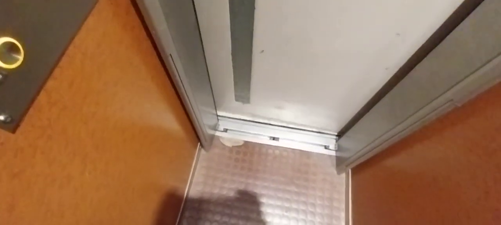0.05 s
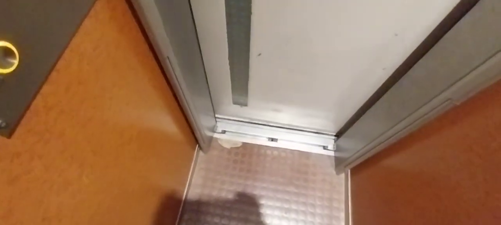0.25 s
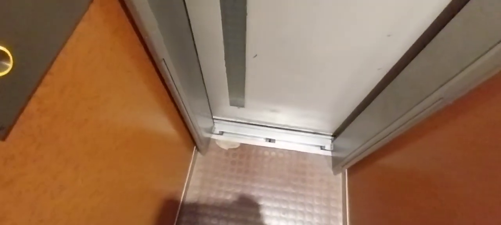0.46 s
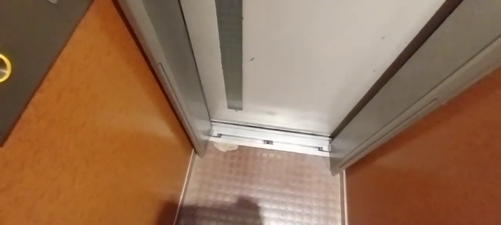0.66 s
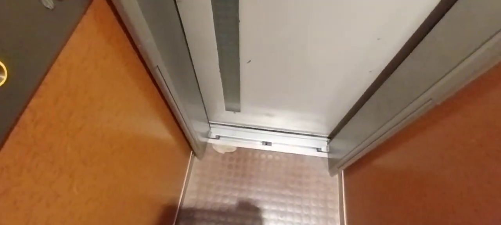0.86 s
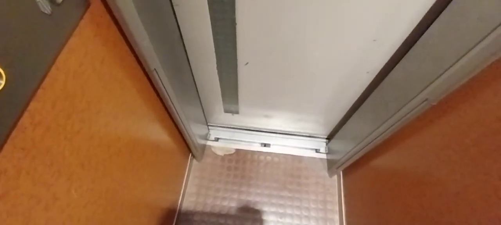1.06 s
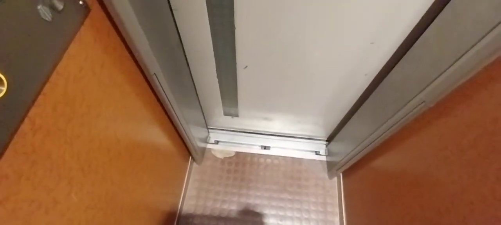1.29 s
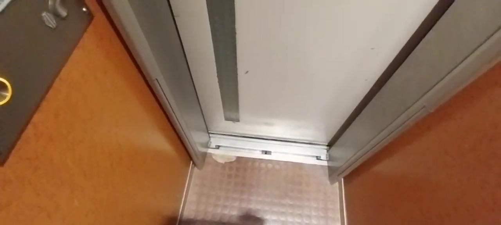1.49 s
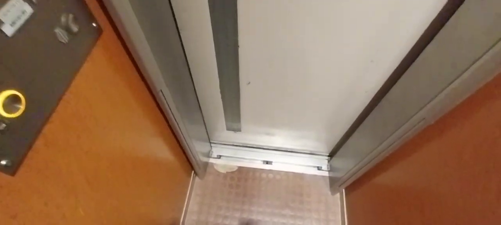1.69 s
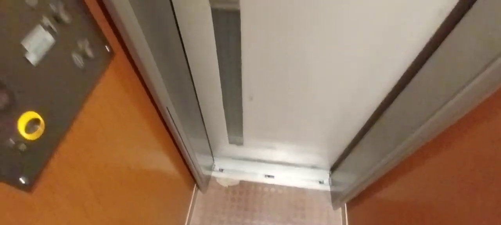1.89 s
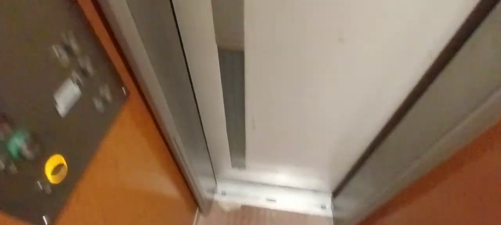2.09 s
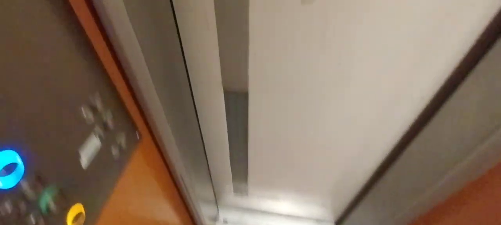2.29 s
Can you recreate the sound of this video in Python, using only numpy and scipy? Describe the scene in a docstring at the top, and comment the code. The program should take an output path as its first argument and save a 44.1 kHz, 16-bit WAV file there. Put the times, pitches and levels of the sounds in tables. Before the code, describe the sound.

An elevator door locks with sharp latch clicks and a loud metallic clunk, heard from inside the small cabin. A second, softer knock follows, and the cabin rumbles briefly before settling into a faint low hum.

```python
"""An elevator door locks, heard from inside the small cabin. First the latch clicks and steel parts
clack as the lock snaps over; the door clunks, and its blows ring the modes of the door and wall panels.
Two light ticks and a second knock follow while the shaken cabin rumbles on. A faint sliding hiss
dies away, leaving a low hum, a soft rustle and three tiny squeaks."""
import sys
import numpy as np
from scipy import signal
from scipy.fft import rfft, irfft
from scipy.io import wavfile
from scipy.ndimage import uniform_filter1d, minimum_filter1d

SR = 44100
rng = np.random.default_rng(int(sys.argv[2]) if len(sys.argv) > 2 else 0)


def wav_record(signal):
    """Record a signal, one row per channel, as 16-bit PCM in the file named by sys.argv[1]."""
    frames = np.transpose(np.atleast_2d(signal))
    bounded = np.clip(frames, -1, 1)
    # unit amplitude maps onto the largest positive 16-bit level
    quanta = np.round(bounded * 32767).astype(np.int16)
    wavfile.write(sys.argv[1], SR, quanta)


N = 108045


def undb(db):
    return 10 ** (np.asarray(db) / 20)


def on_log(points, hz):
    """Interpolation of (frequency, value) points on a logarithmic frequency axis."""
    freqs, values = np.array(points, float).T
    return np.interp(np.log(np.maximum(hz, 1)), np.log(freqs), values)


def envelope(points, column=1):
    """Amplitude over time, interpolated in decibels from one column of a table."""
    table = np.array(points, float)
    return undb(np.interp(np.arange(N) / SR, table[:, 0], table[:, column]))


def pan(db):
    """Level difference between the channels, left minus right."""
    return undb(np.array([[db], [-db]]) / 2)


def decay(t, t60):
    """Exponential damping: the level falls 60 dB in t60 seconds."""
    return np.exp(-np.log(1000) * t / t60)


def add(out, start_s, sound):
    """Superposition of a sound from its onset time."""
    i = max(int(start_s * SR), 0)
    n = min(sound.shape[-1], N - i)
    out[:, i:i + n] += sound[..., :n]


def wander(width, size):
    """Random fluctuation of unit variance, correlated over about `width` steps."""
    x = np.interp(np.arange(size) / max(width, 1), np.arange(size), rng.standard_normal(size))
    return x / np.std(x)


# Stereo width of the sound field (frequency [Hz], side relative to mid [dB])
STEREO_WIDTH = [(30, -37), (80, -12), (160, -12), (300, -3.5), (600, -3.5), (1200, -0.5), (16000, 0)]

def noise(spectrum, tilt_db=0, size=2 ** 17):
    """Shaped noise with unit mid power; coherence between the channels falls from bass to treble."""
    hz = np.arange(size // 2 + 1) * SR / size
    mid, side = rfft(rng.standard_normal((2, size)))
    side = side * undb(on_log(STEREO_WIDTH, hz))
    gain = undb(on_log(spectrum, hz) + tilt_db * np.log2(np.maximum(hz, 1)))
    gain = gain / np.sqrt(np.mean(gain ** 2))
    return irfft(np.array([mid + side, mid - side]) * gain)[:, :N]


def ring(modes, spread):
    """Impulse response as a sum of damped modes, each differing in level and phase between channels."""
    t = np.arange(int(1.5 * SR)) / SR
    out = np.zeros((2, len(t)))
    for (hz, db, t60), (a, b) in zip(modes, rng.standard_normal((len(modes), 2))):
        side = spread * hz / 300 * (a + 1j * b)
        side = side / max(1, abs(side))
        phasors = np.array([[1 + side], [1 - side]]) * np.exp(2j * np.pi * hz * t)
        out += np.imag(phasors) * undb(db) * decay(t, t60)
    return out


# Modes of the door and wall panels (frequency [Hz], level [dB], T60 [s])
PANEL_MODES = [(31.5, -11.5, 0.76), (48.8, -14, 1.6), (70.2, -8.5, 0.81), (90.8, -7, 0.43),
               (159.4, -2, 0.35), (172, 1.5, 0.52), (188, -7, .3), (237, -0.5, 0.26), (311.7, -7, 0.7),
               (330, -2.5, 0.35), (359, -10.5, .22), (387.3, -14.5, .35), (471.5, -8, 0.38),
               (555.5, -8.5, 0.25), (642, -18, 0.44), (683.5, -20.5, .7)]
# Short, dense boom of the cabin (frequency [Hz], relative level [dB])
BOOM_SPECTRUM = [(20, -15), (60, -9), (120, -7), (165, 4), (210, -12), (290, -1.5), (380, -9), (600, -6.5),
                 (900, -18.5), (2000, -60)]
# Blows on the door (time [s], level [dB], contact time [s])
BLOWS = [(0.2426, -9, 0.0014), (0.3214, -28.5, 0.0014), (0.376, -21.5, 0.0074), (0.6396, -24, .0013),
         (0.6636, -28.5, 0.0011), (.696, -27.5, 0.0015), (.885, -41, 0.0023)]
PANEL_SPREAD, BUILD_UP_S = 0.04, 0.0035
BOOM_DB, BOOM_T60_S = -2, 0.29

def door():
    """Impact excitation: a half-sine force drives panels and cabin; longer contact sounds duller."""
    out, size = np.zeros((2, N)), 2 ** 16
    t = np.arange(size) / SR
    panels = ring(PANEL_MODES, PANEL_SPREAD)[:, :size]
    build_up = 1 - np.exp(-t / BUILD_UP_S)
    for start, db, contact in BLOWS:
        force = np.sin(np.pi * np.minimum(t[:2 ** 11] / contact, 1))
        boom = undb(BOOM_DB) * noise(BOOM_SPECTRUM, size=size) * decay(t, BOOM_T60_S)
        response = (boom - panels) * build_up
        add(out, start, undb(db) * signal.fftconvolve(response, force[None] / force.sum(), axes=1))
    return out * pan(db=-0.8)


# Decay of struck steel in the cabin (frequency [Hz], T60 [s])
STEEL_DECAY = [(400, 0.59), (1500, 0.36), (4000, 0.3), (8000, 0.26), (14000, 0.19)]
CRACK_DECAY_S, RESONANCE_WIDTH_HZ = 0.0049, 39.85

def steel_strikes(events, spectrum, ripple_db):
    """Reverberation: the walls prolong the dense ring after each crack, and the treble dies first."""
    out, size = np.zeros((2, N)), 2 ** 15
    t, hz = np.arange(size) / SR, np.arange(size // 2 + 1) * SR / size
    resonances = undb(ripple_db * wander(RESONANCE_WIDTH_HZ * size / SR, size=len(hz)))
    resonances = resonances / np.sqrt(np.mean(resonances ** 2))
    # Overlapping triangular bands, each with its own decay time
    bands = [on_log([(f, float(f == centre)) for f, _ in STEEL_DECAY], hz) for centre, _ in STEEL_DECAY]
    tails = [decay(t, t60) for _, t60 in STEEL_DECAY]
    for start, db, tilt, rise, crack_db in events:
        crack = undb(crack_db) * np.exp(-t / CRACK_DECAY_S)
        steel = rfft(noise(spectrum, tilt, size=size)) * resonances
        strike = sum(irfft(steel * band) * (tail + crack) for band, tail in zip(bands, tails))
        add(out, start, undb(db) * strike * np.minimum(t / rise, 1))
    return out


# Light clicks of the latch and hard clacks of the door on its steel frame
# (time [s], level [dB], tilt [dB/octave], rise time [s], crack relative to ring [dB])
LATCH_CLICKS = [(.1872, -26.5, .5, 0.0017, -3), (.201, -28, -2.5, 0.0024, -3), (.2148, -26, -1, .002, 0.5),
                (.3218, -32.5, -2.5, 0.0015, 1.5), (.3742, -36, -1.9, 0.00078, 2),
                (.5272, -46, -1.5, 0.00056, 7.5), (.5503, -41.5, -1, .0005, 0)]
FRAME_CLACKS = [(.226, -23, -2.5, 0.0027, -5.5), (.2445, -24, -2.35, 0.0023, 3.5),
                (.2555, -22.5, 0.5, .002, 1.5), (.268, -26, -3.5, 0.0025, 0), (.325, -30, 0.4, 0.0012, -2),
                (0.337, -37.5, -11, 0.0023, 0), (0.6421, -41.5, -0.4, 0.0059, 3),
                (.6632, -34, 0.63, 0.0013, -1.5)]
# Spectra of the latch and the frame (frequency [Hz], relative level [dB])
LATCH_SPECTRUM = [(200, -7.5), (550, 1.5), (1000, -5.5), (1650, -9), (2250, -8), (3000, -22.5),
                  (3700, -14.5), (4400, -7), (5100, -8), (6000, -7), (7200, -1), (8600, -20), (9800, -8),
                  (11000, -0.5), (12600, 3), (14400, -1), (16000, -12)]
FRAME_SPECTRUM = [(200, 7), (500, 3.5), (1000, -0.5), (1400, 4.5), (2100, 3), (3000, -2), (4300, 2.5),
                  (5300, 2.5), (6100, -1.5), (7000, -1), (8600, -8.5), (10500, 1.5), (12300, 2),
                  (16000, -6)]
# Modes of the lock bolt (frequency [Hz], level [dB], T60 [s])
BOLT_MODES = [(788, -8, 0.64), (963.4, -9, 0.44), (1336, -9, 0.23), (2236, -1.5, 0.23), (2300, -2, 0.15),
              (2945, -12.5, 0.13), (3320, -13, 0.16), (4470, -7.5, 0.26), (4900, -9.5, .3),
              (6660, -6, 0.15), (11000, -8, .25), (11800, -10.5, .25), (12107, -12.5, .25)]
# Impacts on the bolt (time [s], level [dB])
BOLT_IMPACTS = [(.21, -43), (.25, -39.5), (.316, -34.5), (.334, -35.5)]

def lock():
    """Free vibration after impact: latch and frame ring in dense resonances, the bolt in a few modes."""
    out = steel_strikes(LATCH_CLICKS, LATCH_SPECTRUM, ripple_db=4.5)
    out += steel_strikes(FRAME_CLACKS, FRAME_SPECTRUM, ripple_db=2.5)
    bolt = ring(BOLT_MODES, spread=0.17)
    for start, db in BOLT_IMPACTS:
        add(out, start, undb(db) * bolt)
    return out * pan(db=-3)


# Rumble of the shaken cabin (time [s], bass level [dB], panel drone level [dB])
RUMBLE_LEVELS = [(0, -61, -50), (.17, -61, -71), (.4, -24, -39), (.56, -38, -50.5), (.66, -30.5, -37),
                 (.79, -32, -45), (.87, -39, -43), (.95, -33, -45.5), (1.12, -36.5, -50.5),
                 (1.24, -38, -53.5), (1.35, -48, -63), (1.65, -49, -69.5), (2.08, -49.5, -65.5),
                 (2.25, -53.5, -61.5), (2.45, -50.5, -60)]
# Spectra of the bass and the panel drone (frequency [Hz], relative level [dB])
BASS_SPECTRUM = [(15, -17), (30, 2.5), (45, 10.5), (60, 2), (75, -8), (93, -3), (125, -18), (200, -58)]
DRONE_SPECTRUM = [(100, -2.5), (145, -2.5), (167, 7), (205, -17), (238, -3), (275, -17), (315, -8),
                  (390, -28.5), (475, -23), (700, -28.5), (1000, -52.5), (2000, -49.5)]

def rumble():
    """Random vibration: the shaken cabin radiates low noise gathered around its resonances."""
    bass = noise(BASS_SPECTRUM) * envelope(RUMBLE_LEVELS, column=1)
    drone = noise(DRONE_SPECTRUM) * envelope(RUMBLE_LEVELS, column=2)
    return bass + drone


# Panel vibration sustained by the cabin's motion (time [s], level [dB])
SHUDDER_LEVELS = [(0, -72), (.2, -64.5), (.42, -32), (.6, -42), (.72, -33.5), (.84, -43), (.92, -43),
                  (1.15, -49.5), (1.35, -67.5), (1.46, -62.5), (1.56, -70.5), (1.72, -68), (2.1, -66.5),
                  (2.25, -64), (2.45, -68)]
SHUDDER_DB_PER_OCTAVE = -3.5

def shudder():
    """Forced vibration: a random force keeps the panel modes above 80 Hz sounding."""
    modes = [(hz, db + SHUDDER_DB_PER_OCTAVE * np.log2(hz), t60)
             for hz, db, t60 in PANEL_MODES if hz > 80]
    panels = ring(modes, PANEL_SPREAD)
    force = rng.standard_normal((1, N + panels.shape[1] - 1))
    vibration = signal.fftconvolve(force, panels, mode="valid", axes=1)
    return vibration / np.std(vibration) * envelope(SHUDDER_LEVELS)


# Low hum of the cabin (time [s], frequency [Hz], level [dB])
HUM_TRACK = [(0, 162.5, -49.5), (.15, 164.3, -62.5), (0.401, 160, -37.5), (.8, 166, -41), (0.898, 172, -58),
             (1.12, 170.9, -41.5), (1.25, 167.1, -63), (1.5, 162.8, -60.5), (1.9, 165, -69.5),
             (2.45, 165.2, -68)]

def hum():
    """A pure tone whose phase is the integral of its slowly drifting frequency."""
    times, freqs, _ = np.array(HUM_TRACK, float).T
    hz = np.interp(np.arange(N) / SR, times, freqs)
    return envelope(HUM_TRACK, column=2) * np.sin(2 * np.pi * np.cumsum(hz) / SR)


# Sliding hiss (time [s], lower band level [dB], upper band level [dB])
SLIDE_LEVELS = [(0, -74.5, -79), (.15, -94, -84.5), (.45, -57, -59.5), (.85, -58, -61.5),
                (1.02, -63.5, -69), (1.25, -68, -69.5), (1.42, -76, -77), (1.5, -86.5, -83.5),
                (1.64, -87.5, -81), (1.72, -79.5, -76.5), (2.07, -92.5, -80), (2.16, -79, -73.5),
                (2.45, -72.5, -83)]
# Spectra of the two bands (frequency [Hz], relative level [dB])
SLIDE_LOW_SPECTRUM = [(700, -14), (1750, -10.5), (2020, 1), (2800, -4.5), (3150, -13.5), (4100, -17.5),
                      (6000, -26)]
SLIDE_HIGH_SPECTRUM = [(3000, -25), (4100, -15), (4500, -0.5), (5200, 1), (5600, -12.5), (7800, -13),
                       (9000, -14), (16000, -26.5)]

def sliding_hiss():
    """Sliding noise: two bands, peaking near 2 and 5 kHz, swell and fade under separate envelopes."""
    lower = noise(SLIDE_LOW_SPECTRUM) * envelope(SLIDE_LEVELS, column=1)
    upper = noise(SLIDE_HIGH_SPECTRUM) * envelope(SLIDE_LEVELS, column=2)
    return lower + upper


# Soft rustle (time [s], level [dB])
RUSTLE_LEVELS = [(0, -83), (.3, -53), (1.6, -89), (1.72, -65.5), (2.1, -65), (2.27, -56.5), (2.36, -62),
                 (2.45, -66)]
# Spectrum of the rustle (frequency [Hz], relative level [dB])
RUSTLE_SPECTRUM = [(200, 7), (450, -7.5), (660, 4.5), (820, -10), (1050, 0), (1500, -21.5), (2100, -7),
                   (3200, -16), (4800, -11.5), (9000, -17), (13000, -10), (16000, -6)]

def rustle():
    """Slow amplitude modulation of broadband noise, heard as a soft rustle."""
    return noise(RUSTLE_SPECTRUM) * envelope(RUSTLE_LEVELS)


# Tiny squeaks (time [s], duration [s], start frequency [Hz], end frequency [Hz], level [dB])
SQUEAK_GLIDES = [(1.8, 0.11, 8450, 8610, -88), (1.97, 0.21, 8350, 8450, -79),
                 (2.21, .15, 10400, 9730, -66.5)]
WAVER_DEPTH, WAVER_S = 0.009, 0.003

def squeaks():
    """Random frequency modulation makes each thin, gliding tone waver as it swells and fades."""
    out = np.zeros((2, N))
    for start, duration, from_hz, to_hz, db in SQUEAK_GLIDES:
        progress = np.linspace(0, 1, int(duration * SR))
        waver = 1 + WAVER_DEPTH * wander(WAVER_S * SR, size=N)[:len(progress)]
        hz = (from_hz + (to_hz - from_hz) * progress) * waver
        tone = np.sin(2 * np.pi * np.cumsum(hz) / SR)
        add(out, start, undb(db) * np.sin(np.pi * progress) * tone)
    return out


# Still air in the cabin (frequency [Hz], relative level [dB])
AIR_SPECTRUM = [(100, 9), (700, 6), (1500, -23), (4000, -50), (7000, -10), (7700, 3), (8700, -26),
                (10500, -3.5), (12800, 4.5), (16000, -1.5)]

def still_air():
    """Stationary noise sets the ambient floor of the cabin."""
    return noise(AIR_SPECTRUM) * undb(-68)


def scene():
    """Linear superposition of the impacts, the cabin's vibration and the faint background."""
    impacts = lock() + door()
    cabin = (shudder() + rumble() + hum()) * pan(db=-2.24)
    background = (sliding_hiss() + rustle() + still_air()) * pan(db=-4.3)
    return impacts + cabin + background + squeaks()


def record(dry):
    """Peak limiting: a brief gain dip holds down the loudest peaks, then a low-pass cuts the top."""
    ceiling, cutoff_hz = 0.92, 15750
    gain = np.minimum(1, ceiling / (np.abs(dry).max(axis=0) + 1e-9))
    gain = uniform_filter1d(minimum_filter1d(gain, size=301), size=301)
    lowpass = signal.ellip(10, .1, 80, cutoff_hz, fs=SR, output="sos")
    return signal.sosfilt(lowpass, dry * gain)


dry = scene()
out = record(dry)
wav_record(out)
```